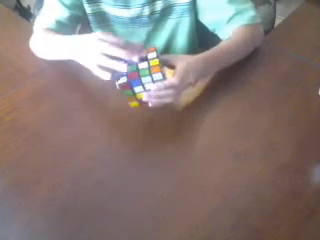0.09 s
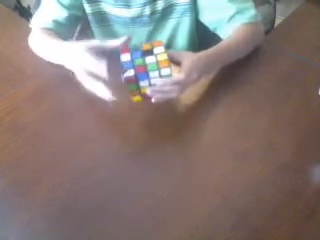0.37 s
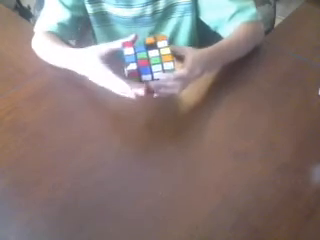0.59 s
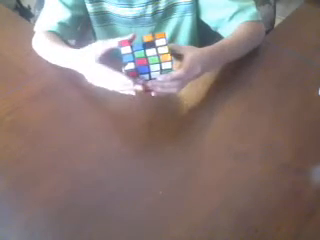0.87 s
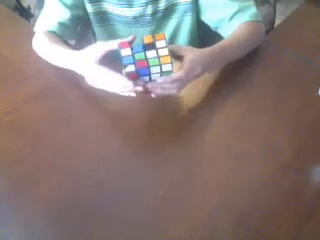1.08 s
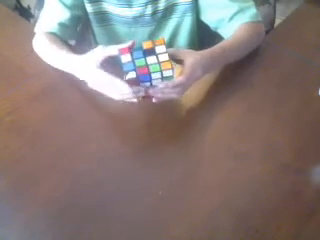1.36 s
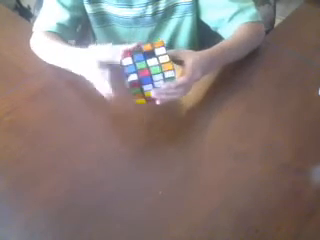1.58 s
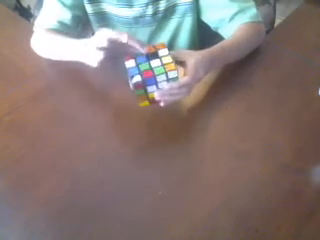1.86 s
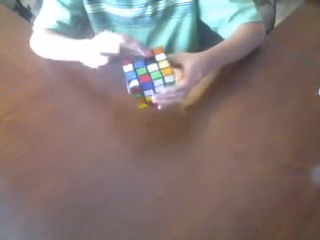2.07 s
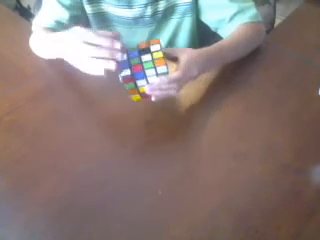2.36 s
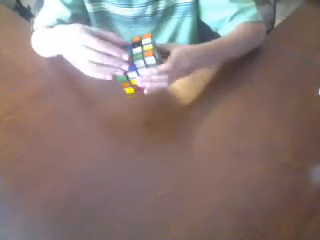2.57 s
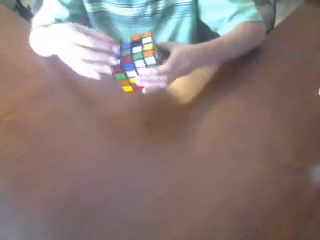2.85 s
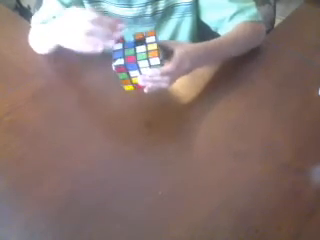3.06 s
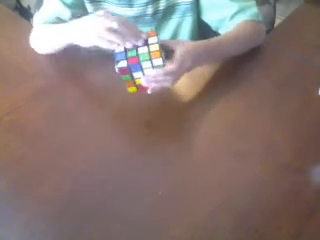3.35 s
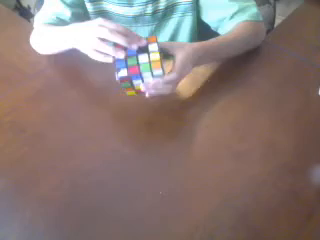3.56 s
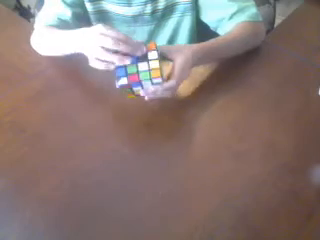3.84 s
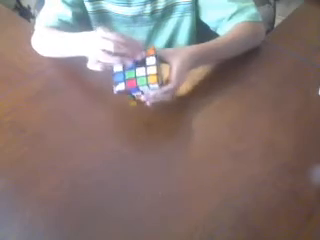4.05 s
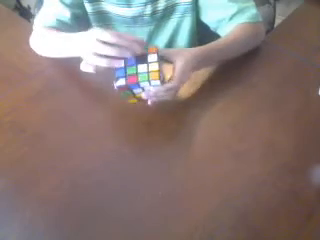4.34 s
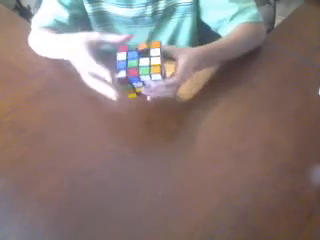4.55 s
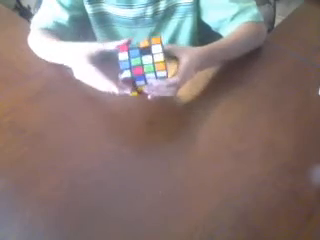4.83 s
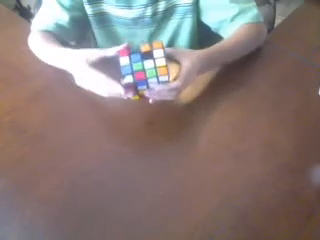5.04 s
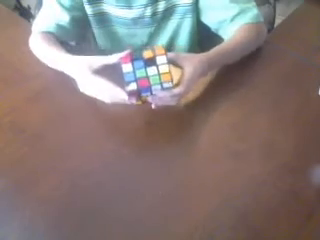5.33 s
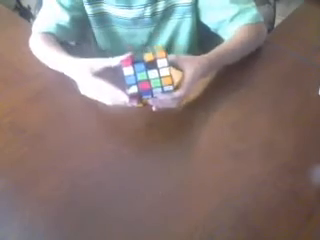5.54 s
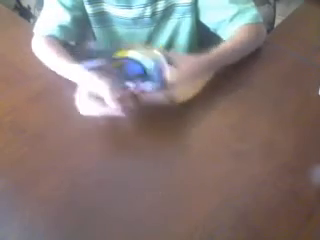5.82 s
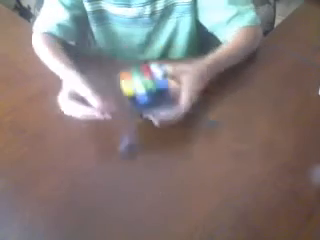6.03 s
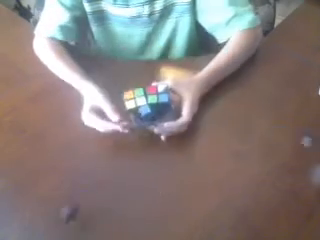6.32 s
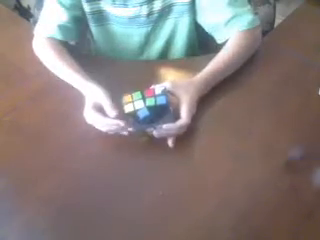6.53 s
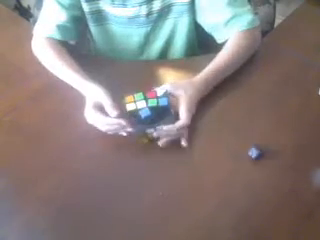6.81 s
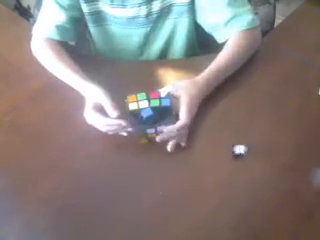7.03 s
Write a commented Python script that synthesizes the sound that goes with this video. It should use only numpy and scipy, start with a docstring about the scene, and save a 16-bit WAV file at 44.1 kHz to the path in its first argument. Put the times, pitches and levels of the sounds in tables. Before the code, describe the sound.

In a small room with low hum and hiss, a plastic puzzle cube is turned by hand, giving faint then sharper clicks over small hollow knocks, in irregular clusters with pauses. After a quiet gap it suddenly bursts, and hard plastic pieces rattle and bounce on a wooden tabletop, so loud that the cheap close microphone distorts. The bounces grow quicker and duller at the end.

```python
"""A plastic puzzle cube is turned by hand over a wooden table: sharp clicks over hollow knocks.
It bursts in the hands, and its pieces clatter and bounce on the table top; struck resonances make every blow.
The place is a small room, its answer only a few dB under each blow, with noise for air and wavering hum lines.
The cheap microphone hums and hisses, picks up little above 8 kHz and overloads on the clatter."""
import sys
import numpy as np
from scipy import signal
from scipy.fft import rfft, irfft, next_fast_len
from scipy.io import wavfile
from scipy.ndimage import map_coordinates

SR = 44100
rng = np.random.default_rng(int(sys.argv[2]) if len(sys.argv) > 2 else 0)


def wrap_up_sound(samples):
    """Save the sound to the file named by the first command line argument, as 16-bit audio."""
    columns = np.atleast_2d(samples).T
    # keep every value between -1 and 1, then stretch to whole-number steps
    tamed = np.clip(columns, -1, 1)
    steps = np.round(tamed * 32767).astype(np.int16)
    wavfile.write(sys.argv[1], SR, steps)


def convert_level_to_amplitude(level_db):
    """Map a level in decibels to its linear amplitude factor."""
    exponent = np.asarray(level_db, float) / 20
    return 10 ** exponent


N = 316638  # length in samples

# Blow levels are peaks of the direct sound at the microphone, ahead of its response and overload.
# room air and microphone hiss, relative spectrum: [f/Hz, level/dB per Hz]
AIR_SPECTRUM = [(20, -15.5), (40, -0.5), (70, -3), (92, -14), (150, -7.5), (212, -10.5), (266, -11.5),
                (326, -17), (520, -19), (1100, -25.5), (1300, -30), (2190, -37), (4000, -42), (6840, -42.5)]
# hum lines ahead of the microphone response: [f/Hz, rms level/dB, wander/Hz]
HUM_LINES = [(34.8, -46, 1.74), (65, -60, 0.6), (121.5, -45.5, 1.24), (160, -52.5, 3.6), (516, -56.5, 2.63),
             (642, -59.5, 2.6)]
# layers of the cube snapping into place: [t/s, click level/dB, hollow knock level/dB, click f/Hz]
TURNS = [(0.115, -41, -42, 6700), (0.138, -27, -33, 4950), (0.3383, -28, -28, 4540),
         (0.609, -27.5, -26.5, 4560), (0.6721, -34.5, -38, 4800), (0.8918, -29, -36, 5260),
         (0.9075, -21, -34.5, 6100), (1.5615, -26.5, -36, 5730), (1.604, -32, -35.5, 5900),
         (1.7943, -7, -21.5, 5640), (1.8007, -15, -31, 6660), (2.235, -15.5, -35, 5900),
         (2.2624, -18, -29.5, 4570), (2.575, -22.5, -37, 5400), (2.5868, -24.5, -37, 6700),
         (2.591, -14, -29, 4960), (2.6236, -27, -37, 6050), (2.6393, -26.5, -33, 3800),
         (2.6476, -32, -33, 5250), (2.699, -32, -41, 4300), (2.726, -36, -41, 6100),
         (2.847, -29, -40, 4670), (2.8548, -25, -42, 4040), (3.2558, -12, -22, 5200),
         (3.2588, -4.5, -22, 6015), (3.4025, -37, -38, 4500), (4.3663, -24, -41, 6350),
         (4.386, -33, -43, 6200), (4.3932, -28, -32, 6360), (4.425, -16, -33, 5600),
         (4.427, -4.5, -23.5, 5370), (4.4444, -12.5, -33, 5200), (4.4493, -12, -28, 5300),
         (4.4811, -15, -29, 5060), (4.7025, -21.5, -34, 4700), (4.7483, -13, -25, 5770),
         (4.7642, -9, -13, 6100), (4.7724, -13.5, -17, 6900), (5.7143, -31.5, -34, 4050)]
# resonances of a plastic piece: [f/Hz, width/Hz, level/dB]
PIECE_MODES = [(3880, 1970, -12.5), (4300, 1000, -4), (6100, 1600, 4), (6120, 1540, 3), (7440, 1200, 0.5)]
# resonances of the hollow core: [f/Hz, width/Hz, level/dB]
HOLLOW_MODES = [(1260, 780, -12.5), (1694, 246, 2.5), (2310, 420, -6), (2900, 950, -33)]
# low resonances, those of the table top: [f/Hz, width/Hz, level/dB]
TABLE_MODES = [(47.4, 14, -5.5), (122.2, 18.5, 2), (260, 84, -10), (402, 76, -3.5), (538, 76, -3.5),
               (630, 87, -2.5), (951, 153, -1.5), (1430, 214, -2), (1710, 232, 0.5), (2086, 484, -1),
               (2436, 520, -5), (2820, 180, -2.5), (3090, 740, -6.5), (4100, 1540, -8.5)]
# the burst in the hands, then several pieces rattling down on the table:
# [t/s, length/s, first click level/dB, first low knock level/dB, click f/Hz before stray]
FLURRIES = [(5.823, 0.04, 10, -8, 6490), (5.837, 0.0074, 7, 6, 6240), (5.875, 0.0045, -4, -25, 5760),
            (5.905, .018, -5, -31, 6040), (5.931, .008, 9, -14, 6730), (5.952, 0.0028, 4, -21, 6400),
            (6.034, 0.053, 14.5, 12.5, 4270), (6.087, 0.026, 6, -1.5, 6800), (6.187, 0.021, 9.5, 8.5, 4200),
            (6.225, 0.013, 6, 10, 4300), (6.255, 0.0065, 7, 8.5, 4500), (6.275, 0.013, 12, 5.5, 4096),
            (6.306, 0.019, -7, 6, 4760), (6.394, 0.019, 4.5, 6.5, 4850), (6.467, 0.026, 10, 9.5, 4500),
            (6.512, 0.0076, 17, 2, 6700), (6.543, 0.033, 13, 8, 4440), (6.684, 0.036, 2.5, 9.5, 4200),
            (6.82, .024, -13, 4, 4200), (6.928, 0.012, -1.5, 2, 4200), (7.039, 0.0061, -1.5, 4.5, 4010)]
# single contacts: one knock within the burst, then pieces bouncing: [t/s, click level/dB, low knock level/dB]
BOUNCES = [(5.9329, 0, -7), (6.012, -36, -28), (6.594, -8, -1), (6.631, -4.5, 3.5), (6.755, 2.5, 2),
           (6.784, 3.5, 0), (6.807, -0.5, 1.5), (6.871, -7, 2), (6.886, -1, 2), (6.917, -20, -4.5),
           (6.954, 0.5, 4.5), (6.995, -13, -5.5), (7.012, -13, -1), (7.067, -19, -0.5), (7.095, -12.5, 1),
           (7.115, -16, -4), (7.129, -17, -2), (7.143, -15, -4), (7.153, -23, -5.5), (7.165, -20, -2.5),
           (7.176, -18, 0)]
# response of the microphone input, ahead of the overload: [f/Hz, level/dB]
MIC_INPUT = [(7050, 1), (7350, -4), (8150, 0), (8450, -59), (9500, -93)]
# treble response after the overload: [f/Hz, level/dB]
MIC_OUTPUT = [(7000, -2), (7400, -6.5), (8200, -7.5), (8500, -3.5), (10500, -3), (11000, -11.5),
              (15800, -10.5), (16100, -68)]

# a faint tick just before each snap: lead/s, level/dB against the snap
EARLY_S, EARLY_DB = 0.0043, -20
# loose parts tick faintly after a snap: longest wait/s, highest level/dB against the snap, range below it/dB
SETTLE_S, SETTLE_DB, SETTLE_RANGE_DB = 0.022, -17, 16
SETTLE_LOW_HZ, SETTLE_HIGH_HZ = 4500, 7100
# contacts in a flurry: mean gap/s, its scatter as a share, level scatter/dB
GAP_S, GAP_SCATTER, SCATTER_DB = 0.011, 0.5, 4
# loss along a flurry, and the further loss once its length is over
TIRE_DB_PER_S, REST_DB_PER_S = 70, 1800
# a faint contact just before the flurry: lead/s, level/dB against its first contact
LEAD_S, LEAD_DB = 0.0039, -22
# high note of a single contact and low note of any; the strays are standard deviations of log f
CLICK_HZ, KNOCK_HZ, CLICK_STRAY, KNOCK_STRAY = 4200, 1857, 0.098, 0.22
BODY_HZ = np.fft.rfftfreq(4096, 1 / SR)  # frequencies at which a struck body is computed


def unit(x):
    """Scale x to rms 1."""
    return x / np.sqrt(np.mean(x ** 2) + 1e-20)


def coloured(x, points):
    """Filter x through a gain given as (f/Hz, level/dB) points on a log frequency axis."""
    size = next_fast_len(N + 8192)
    hz, db = np.transpose(points)
    log_hz = np.log(np.fft.rfftfreq(size, 1 / SR) + 1)
    gain = convert_level_to_amplitude(np.interp(log_hz, np.log(hz), db))
    return irfft(rfft(x, size) * gain, size)[..., :N]


def wobble(rate):
    """A smooth random curve through normal draws, rate knots a second."""
    knots = rng.standard_normal(N // 1000)
    return map_coordinates(knots, [np.arange(N) * rate / SR])


def room_tone():
    """Gently swaying filtered noise for air and hiss, with hum lines that drift in level and pitch."""
    air = unit(coloured(rng.standard_normal(N), AIR_SPECTRUM))
    air *= convert_level_to_amplitude(-36.0 + 0.5 * wobble(2.98))
    hum = np.zeros(N)
    for hz, db, wander in HUM_LINES:
        level = convert_level_to_amplitude(db + 1.07 * wobble(7.5))
        phase = 2 * np.pi * np.cumsum(hz + wander * wobble(6.8)) / SR
        hum += np.sqrt(2) * level * np.sin(phase)  # sqrt(2) turns rms into peak
    return air + hum


def add(track, s, sound):
    """Lay a sound into the track at s seconds, cut off at the end of the track."""
    part = track[round(s * SR):][:len(sound)]
    part += sound[:len(part)]


def dying(length, t60):
    """Noise of so many samples that falls 60 dB in t60 seconds."""
    return rng.standard_normal(length) * convert_level_to_amplitude(-60 * np.arange(length) / SR / t60)


def body_response(modes, spread_db):
    """Sum of resonances with scattered levels; neighbours in frequency swing in opposite phase."""
    gains = convert_level_to_amplitude(spread_db * rng.standard_normal(len(modes)))
    body = 0
    for gain, (centre, width, db) in zip(gains, modes):
        sign = (-1) ** sum(centre > other for other, _, _ in modes)
        damping = 1j * BODY_HZ * width
        body = body + sign * gain * convert_level_to_amplitude(db) * damping / (centre ** 2 - BODY_HZ ** 2 + damping)
    return body


def struck(modes, contact_s, rattle_db, spread_db, room_db, room_s):
    """A hard contact and three weaker rebounds ring the modes to direct peak 1, and the room answers."""
    body = body_response(modes, spread_db)
    contact = dying(2048, contact_s)
    contact[0] = 4.2  # the first touch is a clean impulse
    for late, weak in rng.random((3, 2)):
        rebound = convert_level_to_amplitude(rattle_db - 6.8 * weak) * dying(1024, contact_s)
        add(contact, 0.002 + 0.01 * late, rebound)
    ring = irfft(rfft(contact, 4096) * body)
    ring /= np.abs(ring).max()
    # the walls' answer swells over the first milliseconds
    room_length = SR // 3
    swell = 1 - np.exp(-np.arange(room_length) / SR / 0.0012)
    # many paths blur the blow: the answer keeps only the colour of the body
    sound = signal.fftconvolve(swell * dying(room_length, room_s), irfft(body))
    sound *= convert_level_to_amplitude(room_db) * np.linalg.norm(ring) / np.linalg.norm(sound)
    sound[:len(ring)] += ring
    return sound


def snaps():
    """Every snap, the faint tick before it and two settling ticks: (t/s, click/dB, knock/dB, click f/Hz)."""
    rows = list(TURNS)
    for s, click_db, knock_db, hz in TURNS:
        rows.append((s - EARLY_S, click_db + EARLY_DB, knock_db + EARLY_DB, hz))
        for late, weak, note in rng.random((2, 3)):
            tick_db = SETTLE_DB - SETTLE_RANGE_DB * weak
            tick_hz = SETTLE_LOW_HZ + (SETTLE_HIGH_HZ - SETTLE_LOW_HZ) * note
            rows.append((s + SETTLE_S * late, click_db + tick_db, knock_db + tick_db, tick_hz))
    return rows


def cube():
    """Each snap rings sharp plastic, with a note for the part that moved, over the knock of the hollow core."""
    out = np.zeros(N)
    for s, click_db, knock_db, click_hz in snaps():
        click = struck(PIECE_MODES + [(click_hz, 1100, 4)], contact_s=0.009, rattle_db=-13,
                       spread_db=3.0, room_db=-7, room_s=0.17)
        knock = struck(HOLLOW_MODES, contact_s=0.0029, rattle_db=-6,
                       spread_db=0.5, room_db=-5, room_s=0.12)
        add(out, s, convert_level_to_amplitude(click_db) * click)
        add(out, s, convert_level_to_amplitude(knock_db) * knock)
    return out


def contacts():
    """Every contact of flurries and bounces: (t/s, click/dB, knock/dB, click f/Hz, knock f/Hz)."""
    rows = [(s, click_db, knock_db, CLICK_HZ) for s, click_db, knock_db in BOUNCES]
    step = np.arange(7)
    later = step > 0  # the first contact keeps its time and level
    for s, length, click_db, knock_db, click_hz in FLURRIES:
        jitter = GAP_SCATTER * rng.uniform(-1, 1, len(step)) * later
        late = GAP_S * (step + jitter)
        loss_db = TIRE_DB_PER_S * late + REST_DB_PER_S * np.maximum(late - length, 0)
        scatter_db = SCATTER_DB * rng.standard_normal((2, len(step))) * later
        clicks, knocks = scatter_db - loss_db
        rows.append((s - LEAD_S, click_db + LEAD_DB, knock_db + LEAD_DB, click_hz))
        rows += zip(s + late, click_db + clicks, knock_db + knocks, np.full(len(step), click_hz))
    strays = np.exp(rng.standard_normal((len(rows), 2)) * [CLICK_STRAY, KNOCK_STRAY])
    return [(s, click_db, knock_db, hz * high, KNOCK_HZ * low)
            for (s, click_db, knock_db, hz), (high, low) in zip(rows, strays)]


def pieces():
    """Burst and landings rattle harder than a snap: plastic over a low knock, each with a note of its own."""
    out = np.zeros(N)
    for s, click_db, knock_db, click_hz, knock_hz in contacts():
        click = struck(PIECE_MODES + [(click_hz, 900, 4)], contact_s=0.015, rattle_db=-5,
                       spread_db=2.0, room_db=-5.5, room_s=0.2)
        knock = struck(TABLE_MODES + [(knock_hz, 450, 4)], contact_s=0.018, rattle_db=-5.0,
                       spread_db=2.0, room_db=-3.0, room_s=0.24)
        add(out, s, convert_level_to_amplitude(click_db) * click)
        add(out, s, convert_level_to_amplitude(knock_db) * knock)
    return out


def scene():
    """Room, cube and pieces at the microphone, one channel."""
    return (room_tone() + cube() + pieces())[None]


def roll_off(x):
    """The treble ends steeply here."""
    return signal.sosfilt(signal.butter(12, 16310, fs=SR, output="sos"), x)


def record(dry):
    """The microphone limits the band, overloads with flat tops and adds small standing offsets."""
    heard = coloured(dry, MIC_INPUT) - 0.012
    # bends smoothly into a ceiling of 0.76
    overloaded = heard / (1 + np.abs(heard / 0.76) ** 8) ** (1 / 8) - 0.017
    return roll_off(coloured(overloaded, MIC_OUTPUT))


dry = scene()
out = record(dry)
wrap_up_sound(out)
```